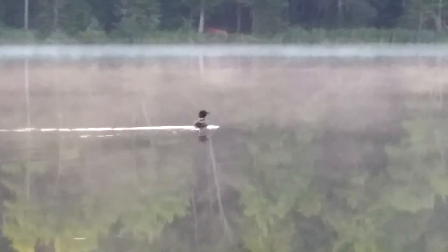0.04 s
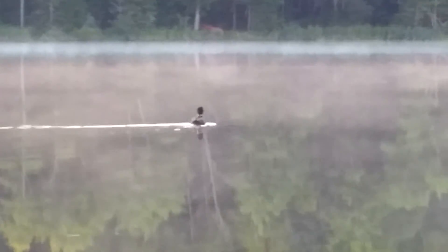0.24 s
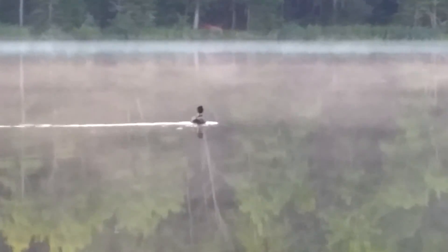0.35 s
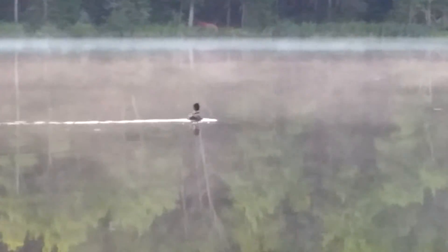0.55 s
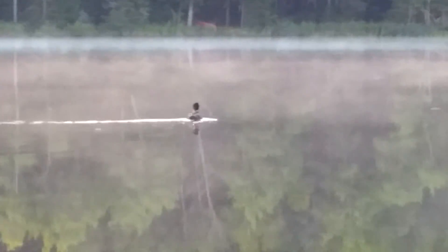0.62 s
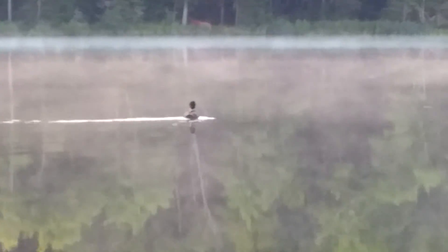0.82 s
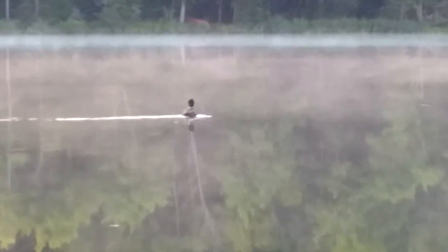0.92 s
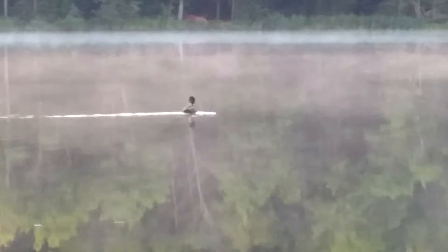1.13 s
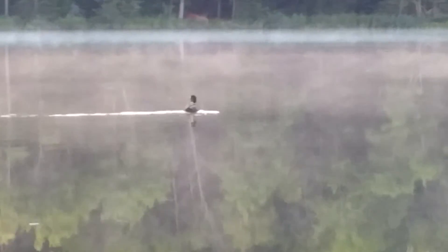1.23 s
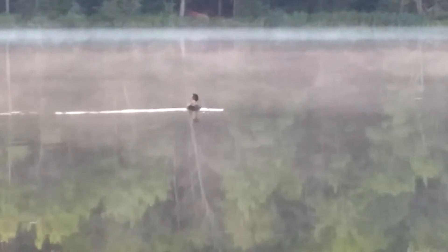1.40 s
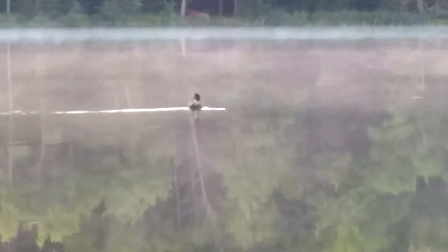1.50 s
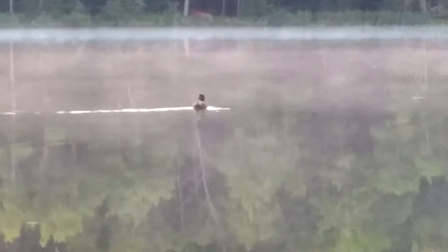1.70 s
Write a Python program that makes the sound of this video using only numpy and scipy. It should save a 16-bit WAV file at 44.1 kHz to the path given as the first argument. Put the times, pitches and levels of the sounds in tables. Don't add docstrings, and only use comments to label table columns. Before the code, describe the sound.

A loon wails once over a calm lake: a soft low scoop, a rising note, then a long hollow note sagging in pitch and dropping away. Trees and far shores echo it over faint hiss; distant mono pickup.

```python
import sys
import numpy as np
from scipy import signal
from scipy.fft import rfft, irfft
from scipy.io import wavfile
from scipy.ndimage import uniform_filter1d

SR = 44100
rng = np.random.default_rng(int(sys.argv[2]) if len(sys.argv) > 2 else 0)


def decibels_to_gain(level_db):
    exponent = np.asarray(level_db, float) / 20
    return 10 ** exponent


def to_wav(sig):
    pcm = np.clip(np.atleast_2d(sig), -1, 1) * 32767
    pcm = np.round(pcm).astype(np.int16)
    wavfile.write(sys.argv[1], SR, pcm.T)


N = 77175

# (time [s], pitch [Hz], fundamental level [dB], second partial level [dB])
SCOOP = [(.15, 462, -72, -56), (.162, 490, -57, -48), (.178, 522, -49, -45), (.204, 567, -41, -49),
         (.218, 596, -38, -59), (.228, 625, -43, -62)]
# (time [s], pitch [Hz])
RISE_PITCH = [(.232, 792), (.31, 827), (.388, 855), (.408, 885)]
# (time [s], level [dB])
RISE_LEVEL = [(.232, -28), (.25, -27), (.3, -25), (.32, -23.5), (.342, -19.5), (.356, -22), (.375, -15.5),
              (.39, -22), (.408, -19.5)]
# (multiple of the pitch, level against the fundamental [dB])
RISE_PARTIALS = [(2, -23), (3, -45), (4, -40), (5, -47), (6, -52), (7, -54), (11, -66)]
# (time [s], level [dB])
LONG_LEVEL = [(.412, -22), (.48, -22), (.55, -21), (.61, -26), (.66, -25), (.725, -16.5), (.78, -23.5),
              (.815, -17), (.855, -27.5), (.9, -21), (.935, -21), (.96, -26), (.99, -22), (1.05, -30),
              (1.11, -32), (1.14, -30), (1.39, -37), (1.437, -37.5)]
# (time [s], level [dB])
LONG_BILL = [(.41, -11), (.6, -5), (.75, 0), (1.0, 0), (1.2, -3), (1.34, -8), (1.43, -22)]
# (multiple of the pitch, starting level [dB], fade [dB per s])
LONG_PARTIALS = [(2, -58, -22), (4, -73, -6), (5, -71, -14), (9, -81, -30), (10, -82, -14)]
# (time [s], pitch [Hz], level [dB])
DROP = [(1.437, 742, -52), (1.449, 731, -36.5), (1.462, 722, -39), (1.475, 714, -47), (1.487, 712, -60)]
# (delay [s], spread [s], level [dB])
SHORES = [
    (.45, 0.12, -28),
    (0.879, 0.041, -28),
    (1.082, .05, -42),
    (1.27, 0.092, -36.5),
]
# (time [s], level [dB])
RASP_LEVEL = [(.14, -75), (.19, -58), (.45, -54.5), (.63, -62.5), (.71, -54), (1.0, -55.5), (1.1, -63.5),
              (1.4, -61.5), (1.6, -65)]
# (frequency [Hz], level [dB per Hz])
RASP_COLOUR = [(40, -14.5), (100, -6), (220, -4), (600, -10), (1280, -13.5), (2000, -13.5), (4000, -19.5),
               (8000, -43.5)]
# (frequency [Hz], level [dB per Hz])
AIR_COLOUR = [(30, -28), (220, -4), (700, -5), (1500, -8), (4000, -12), (6600, -15.5), (7600, -23),
              (15700, -27)]
# (low edge [Hz], high edge [Hz], flicker [dB], rate [flickers per s])
AIR_BANDS = [
    (0, 500, 1.0, 20),
    (500, 2500, 1.3, 25),
    (2500, 5000, 1.6, 25),
    (5000, 7400, 2.0, 40),
    (7400, 11000, 1.8, 35),
    (11000, 22050, 1.6, 30),
]

LONG_START_S, LONG_END_S = 0.412, 1.437
SMOOTH_S = 0.013


def walk(rate):
    hold = int(SR / rate)
    steps = np.repeat(rng.standard_normal(N // hold + 1), hold)
    return 1.2 * uniform_filter1d(uniform_filter1d(steps, hold), hold)[:N]


def curve(table, column=1):
    rows = np.array(table)
    return np.interp(np.arange(N) / SR, rows[:, 0], rows[:, column])


def coloured_noise(colour):
    f, rows = np.fft.rfftfreq(N, 1 / SR), np.array(colour)
    level_db = np.interp(np.log(f + 1), np.log(rows[:, 0]), rows[:, 1])
    noise = irfft(rfft(rng.standard_normal(N)) * decibels_to_gain(level_db) * (f > 35), N)
    return noise / noise.std()


def voice_note(pitch_hz, start_s, end_s, partials):
    t = np.arange(N) / SR
    edge_s = 0.0037
    shaky_hz = pitch_hz * (1 + 0.00041 * walk(25))
    phase = 2 * np.pi * np.cumsum(shaky_hz) / SR
    gate = np.minimum(t - start_s + edge_s, end_s + edge_s - t) / (2 * edge_s)
    fade = np.sin(np.clip(gate, 0, 1) * np.pi / 2) ** 2
    tone = np.zeros(N)
    for multiple, db in partials:
        flicker_db = 2.5 * walk(30) if multiple > 2 else 0
        tone += decibels_to_gain(db + flicker_db) * np.sin(multiple * phase)
    return np.sqrt(2) * fade * tone


def loon():
    return scoop_note() + rising_note() + long_note() + drop_note()


def scoop_note():
    second = curve(SCOOP, 3)
    partials = [(1, curve(SCOOP, 2)), (2, second), (3, second - 16)]
    return voice_note(curve(SCOOP), SCOOP[0][0], SCOOP[-1][0], partials)


def rising_note():
    level = uniform_filter1d(curve(RISE_LEVEL), int(SMOOTH_S * SR / 2))
    overtone_level = -22.5 + 0.6 * (level + 22)
    partials = [(1, level)] + [(round(k), db + overtone_level) for k, db in RISE_PARTIALS]
    return voice_note(curve(RISE_PITCH), RISE_PITCH[0][0], RISE_PITCH[-1][0], partials)


def long_note():
    since = np.arange(N) / SR - LONG_START_S
    pitch_hz = 1048 - 22 * since - 77 * since ** 2
    level = uniform_filter1d(curve(LONG_LEVEL), int(SMOOTH_S * SR))
    partials = [(1, level), (3, -60 + curve(LONG_BILL))]
    partials += [(round(k), db + fade * since) for k, db, fade in LONG_PARTIALS]
    return voice_note(pitch_hz, LONG_START_S, LONG_END_S, partials)


def drop_note():
    level = curve(DROP, 2)
    return voice_note(curve(DROP), DROP[0][0], DROP[-1][0], [(1, level), (2, level - 42)])


def rasp():
    return decibels_to_gain(curve(RASP_LEVEL) + 0.4 * walk(12)) * coloured_noise(RASP_COLOUR)


def scatter(envelope, db):
    return decibels_to_gain(db) * envelope * rng.standard_normal(N) / np.sqrt(np.sum(envelope ** 2))


def lake_echoes(call):
    t = np.arange(N) / SR
    build_up = np.clip(t / 0.056, 0, 1) ** 2
    trees = build_up * np.exp(-np.log(1000) * t / 0.63)
    woods = build_up * np.exp(-np.log(1000) * t / 8.8)
    response = scatter(trees, -13.5) + scatter(woods, -31.5)
    for delay, spread, db in SHORES:
        response += scatter(np.exp(-0.5 * ((t - delay) / spread) ** 2), db)
    sent = call * decibels_to_gain(-12 * (t - LONG_START_S))
    echoes = signal.fftconvolve(sent, response)[:N]
    return signal.sosfilt(signal.butter(1, 5070, fs=SR, output="sos"), echoes)


def songbird():
    t = np.arange(N) / SR - 0.072
    phase = 2 * np.pi * np.cumsum(5800 * (1 + 0.0087 * walk(51))) / SR
    return decibels_to_gain(-74) * np.exp(-(t / 0.02) ** 2) * np.sin(phase)


def air():
    spectrum, f = rfft(coloured_noise(AIR_COLOUR)), np.fft.rfftfreq(N, 1 / SR)
    level_db = -64 + 0.7 * walk(12)
    total = np.zeros(N)
    for low, high, flicker_db, rate in AIR_BANDS:
        band = irfft(spectrum * (f >= low) * (f < high), N)
        total += decibels_to_gain(level_db + flicker_db * walk(rate)) * band
    return total


def scene():
    call = loon()
    mix = call + rasp() + lake_echoes(call) + songbird() + air()
    return mix[None]


def top_cut(x):
    return signal.sosfilt(signal.butter(12, 15860, fs=SR, output="sos"), x)


def record(dry):
    finished = dry - 0.0016
    return top_cut(finished)


dry = scene()
out = record(dry)
to_wav(out)
```